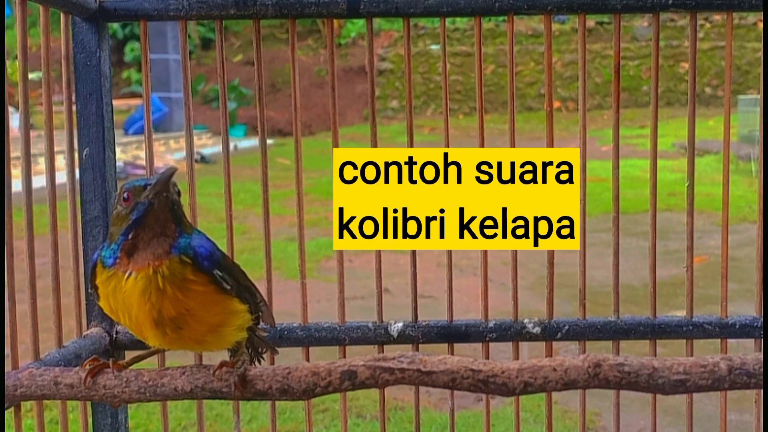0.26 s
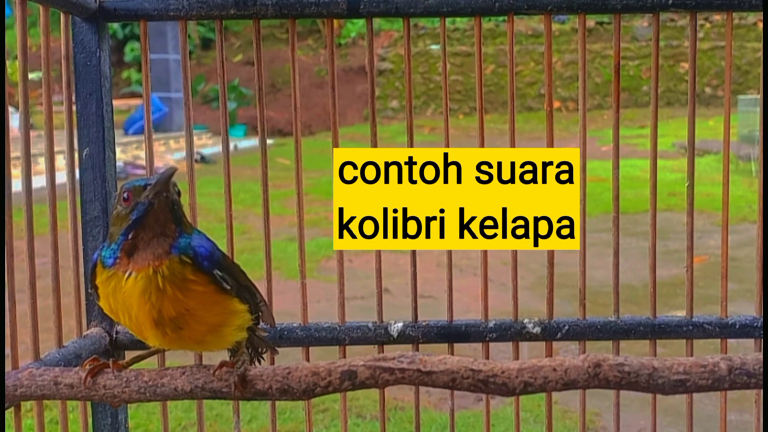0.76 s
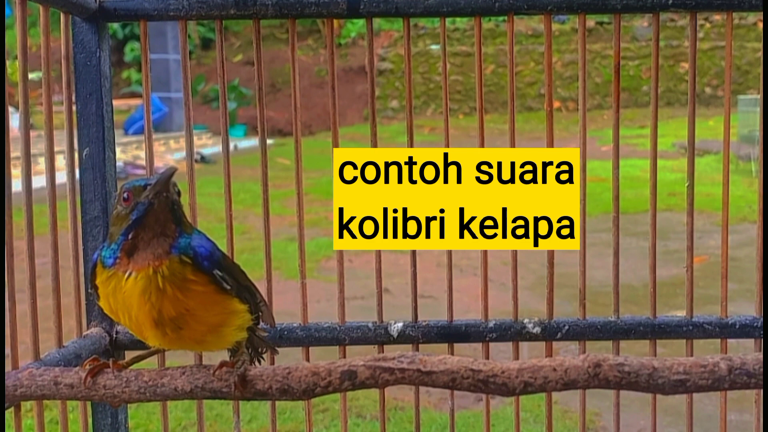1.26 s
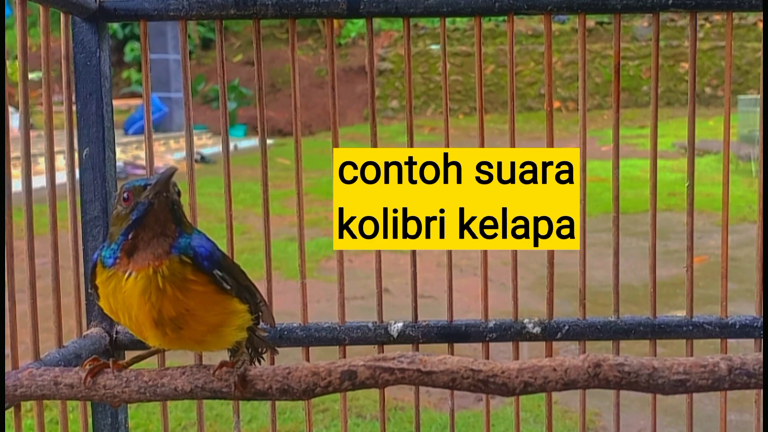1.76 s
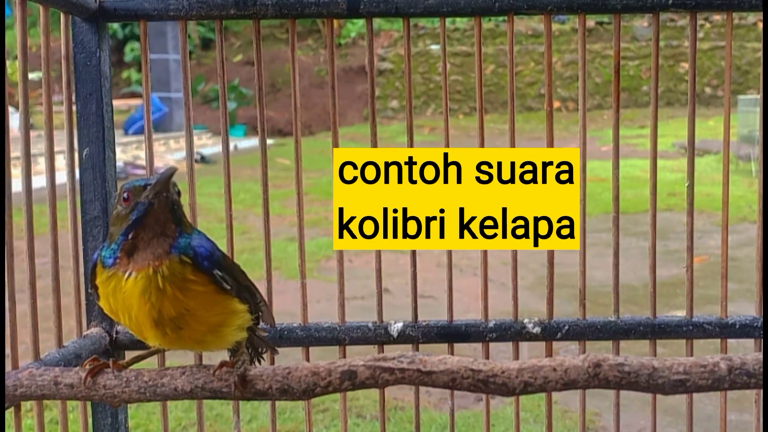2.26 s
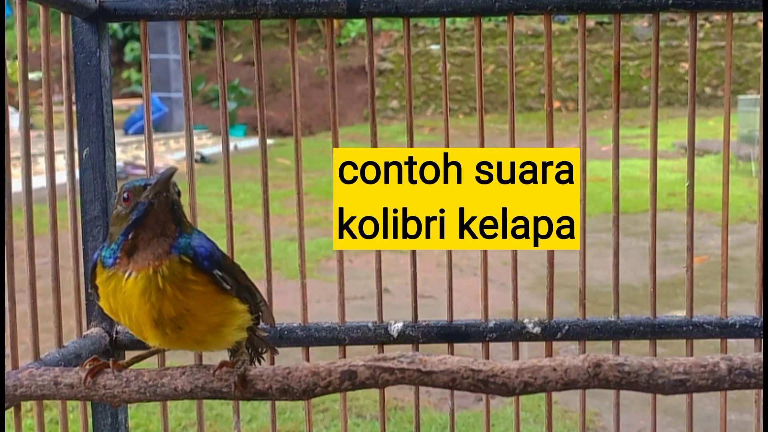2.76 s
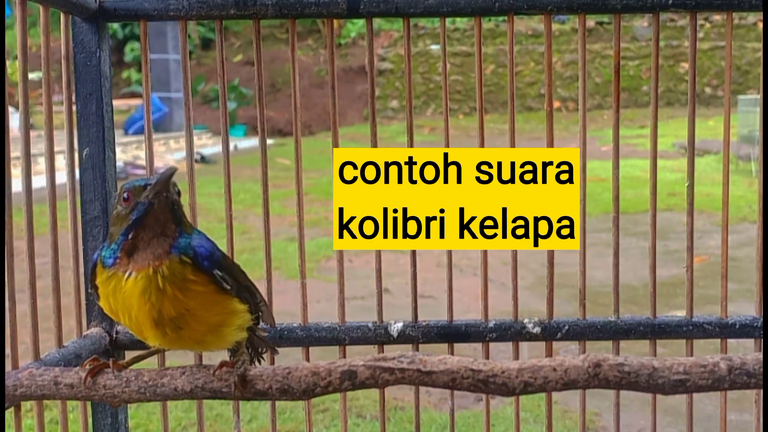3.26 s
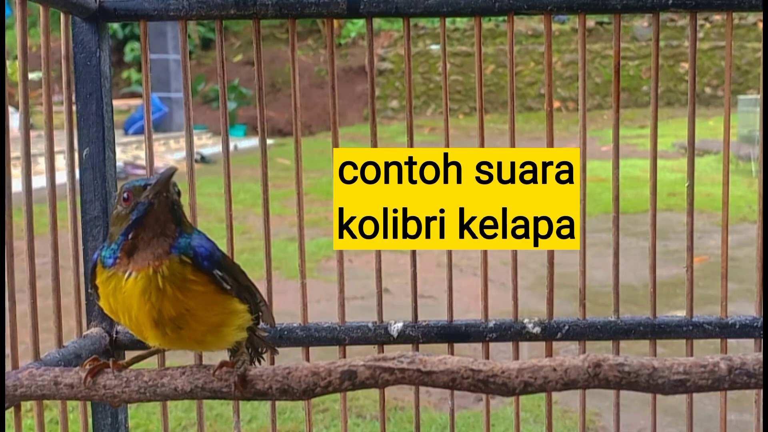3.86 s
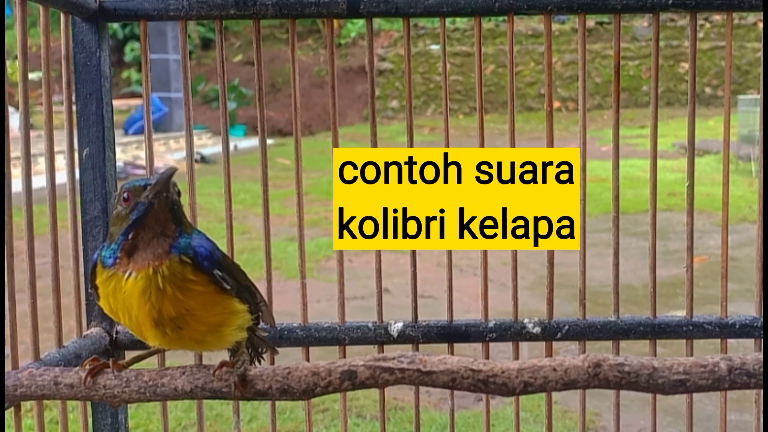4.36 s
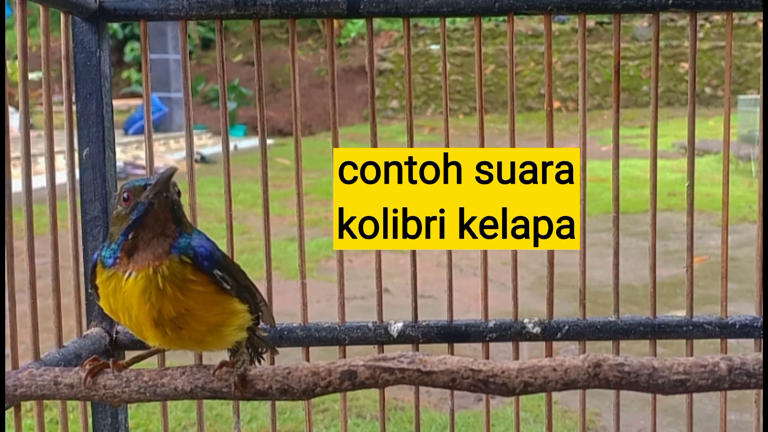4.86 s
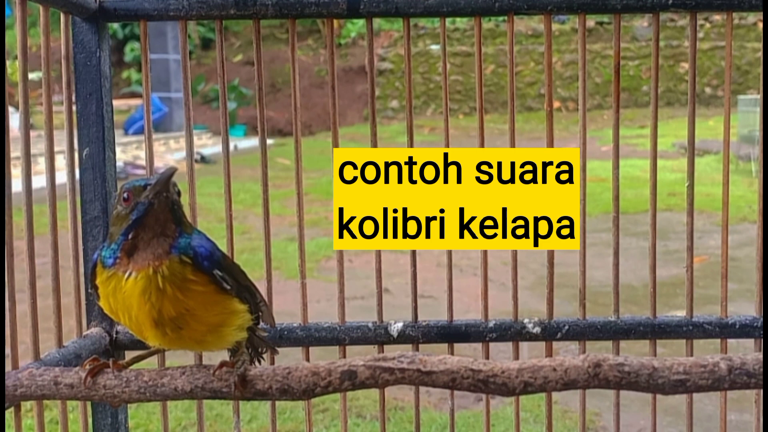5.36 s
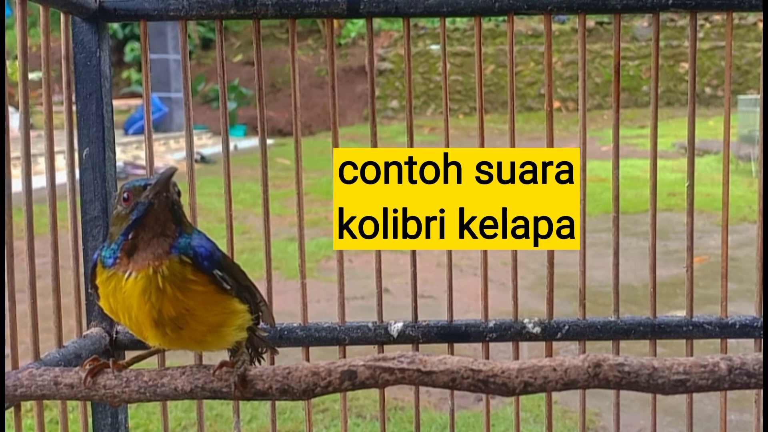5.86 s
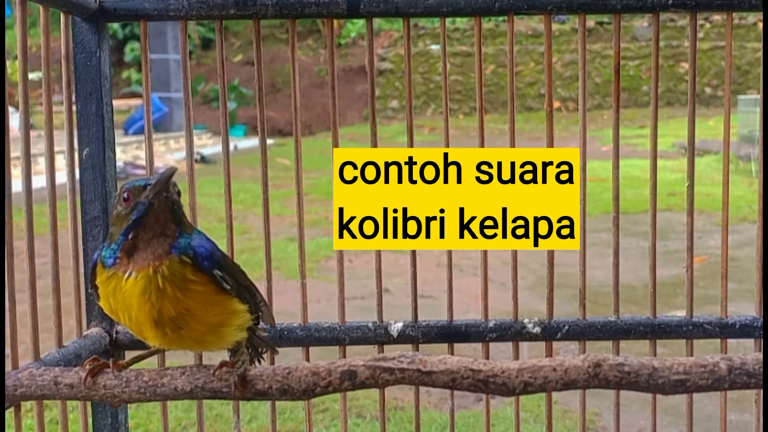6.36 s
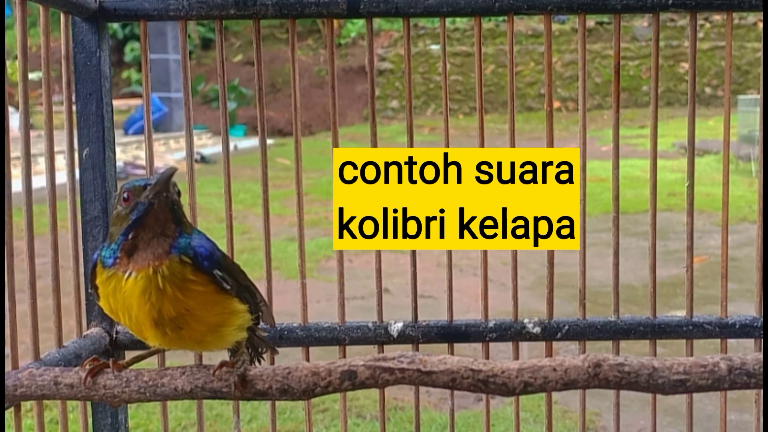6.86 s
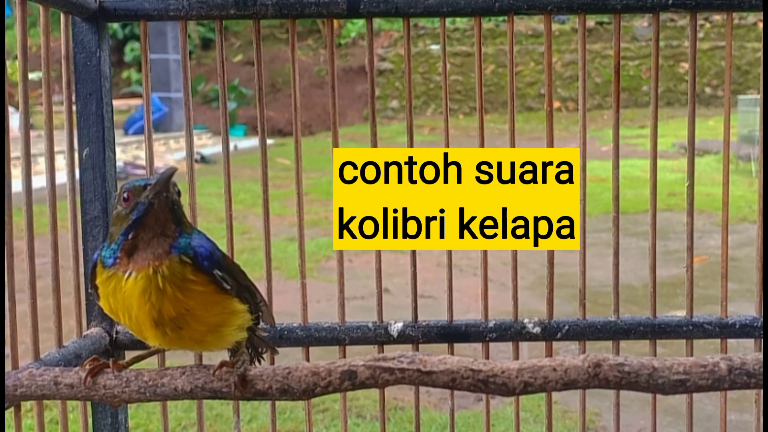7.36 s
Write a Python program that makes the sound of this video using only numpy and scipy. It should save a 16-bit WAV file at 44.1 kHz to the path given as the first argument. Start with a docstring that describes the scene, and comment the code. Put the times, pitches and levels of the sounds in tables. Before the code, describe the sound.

A small bird sings close to the microphone in a wire cage in a garden. A distant engine putters briefly and drops away, then the bird gives swooping high tweets, a fast run of raspy rising chirps, and slower chirps mixed with three nasal notes. Sharp tweets return at the end, with a few faint claw taps and a soft knock. Low traffic rumble and a far bird's whistles sit behind.

```python
"""A garden, where a sunbird sings in a wire cage close to a two-port microphone.
Airflow drives its syrinx into swooping tweets, a fast run of raspy rising chips and three nasal notes.
The wires scatter the song, and the yard reverberates briefly after each note.
Behind it, an engine's firings ring its exhaust and drop away after half a second; traffic rumbles,
a far bird whistles, and near the end come a few claw taps and a soft knock."""
import sys
import numpy as np
from scipy import signal
from scipy.fft import rfft, irfft, next_fast_len
from scipy.io import wavfile
from scipy.ndimage import uniform_filter1d, minimum_filter1d, map_coordinates

SR = 44100
rng = np.random.default_rng(int(sys.argv[2]) if len(sys.argv) > 2 else 0)


def to_wav(sig):
    """Store sig (one row per channel, or 1-D mono) as 16-bit WAV at the path in sys.argv[1].

    Samples outside -1..1 are clipped; the rate is SR.
    """
    pcm = np.clip(np.atleast_2d(sig), -1, 1) * 32767
    pcm = np.round(pcm).astype(np.int16)
    wavfile.write(sys.argv[1], SR, pcm.T)  # frames by channels


N = 336483
TIME = np.arange(N) / SR
CUTOFF_HZ = 15650
# response of the throat and open beak to a partial of a tweet: (frequency [Hz], gain [dB])
THROAT = [(2600, -23.5), (3300, -29.5), (3800, -17.5), (4450, -6.5), (5000, -8.5), (5800, -1), (6600, 3),
          (7500, -9), (8600, -7.5), (10000, -11), (11700, -12), (14000, -16)]


def from_db(db):
    """Amplitude ratio of a level in decibels."""
    return 10 ** (np.asarray(db) / 20)


def rms_one(x):
    """Normalisation to unit mean power."""
    return x / np.sqrt(np.mean(x ** 2) + 1e-20)


def at_hz(points, hz):
    """Interpolation of a table on a logarithmic frequency axis."""
    frequencies, values = np.transpose(points)
    return np.interp(np.log(np.maximum(hz, 1)), np.log(frequencies), values)


def coloured(x, spectrum):
    """Zero-phase filtering: each frequency is scaled by the tabulated gain."""
    size = x.shape[-1]
    return irfft(rfft(x) * from_db(at_hz(spectrum, np.arange(size // 2 + 1) * SR / size)), size)


def white(channels):
    """Uncorrelated white noises, a little longer than the scene."""
    return rng.standard_normal((channels, next_fast_len(N, True)))


def wander(rate_hz):
    """Random modulation: low-passed noise of unit power."""
    lowpass = signal.butter(2, rate_hz, fs=SR, output="sos")
    return rms_one(signal.sosfilt(lowpass, rng.standard_normal(N + SR))[SR:])


def resonance(x, hz, width_hz):
    """A damped two-pole resonator with unit gain at its peak."""
    r = np.exp(-np.pi * width_hz / SR)
    feedback = [1, -2 * r * np.cos(2 * np.pi * hz / SR), r * r]
    return signal.lfilter(np.array([1, 0, -1]) * (1 - r * r) / 2, feedback, x + 1e-18)


def phase_of(hz):
    """Phase in radians, the time integral of frequency."""
    return 2 * np.pi * np.cumsum(hz) / SR


def smooth(x, span_s):
    """A running mean, which rounds off corners."""
    return uniform_filter1d(x, max(1, int(span_s * SR)))


def ease(t, start, end):
    """A raised-cosine step from 0 at start to 1 at end."""
    return (1 - np.cos(np.pi * np.clip((t - start) / (end - start), 0, 1))) / 2


def glide(t, marks):
    """A pitch contour eased through landmarks (time [s], frequency [Hz])."""
    steps = ((b_hz - a_hz) * ease(t, a, b) for (a, a_hz), (b, b_hz) in zip(marks, marks[1:]))
    return marks[0][1] + sum(steps)


def puff(start, end, attack_s, release_s):
    """Time axis and driving pressure of one note: attack, hold, release."""
    t = np.linspace(start, end, int((end - start) * SR))
    return t, ease(t, start, start + attack_s) * (1 - ease(t, end - release_s, end))


def controls(notes, glide_s):
    """Pitch and three gains of a phrase, silent between notes; muscles round off the pitch's corners."""
    times, *columns = np.concatenate(sorted(notes, key=lambda note: note[0][0]), axis=1)
    pitch, *gains = [np.interp(TIME, times, column) for column in columns]
    return smooth(pitch, glide_s), *gains


def engine(roughness=0.29, hiss=1.0, smear=1.8):
    """Forced resonance: the slow firings of one distant cylinder ring the exhaust."""
    # running of the engine: (time [s], firing rate [Hz], level [dB])
    running = [(0, 23.6, -39), (.2, 23.8, -37.5), (0.381, 27, -36.5), (0.489, 20, -40), (0.532, 18, -49),
               (.7, 24.3, -80)]
    # modes of exhaust and body: (frequency [Hz], bandwidth [Hz], gain [dB])
    modes = [(122, 26, 3), (272, 28, 4), (336, 92, -5), (439.4, 19, -0.5), (555, 57, -14.5), (705, 59, -17),
             (834, 20, -13)]
    times, rate, level = np.transpose(running)
    cycles = np.floor(np.cumsum(np.interp(TIME, times, rate)) / SR)
    firings = rms_one(np.diff(cycles, prepend=0)) * (1 + roughness * wander(20))
    firings += hiss * rng.standard_normal(N)
    pipe = sum((-1) ** k * from_db(db) * resonance(firings, hz, width)
               for k, (hz, width, db) in enumerate(modes))
    # reflections from house walls smear the pulses
    mid, side = rng.standard_normal((2, SR // 8)) * np.linspace(1, 0, SR // 8) ** 2
    walls = mid + 0.37 * side * [[1], [-1]]
    reflected = rms_one(signal.fftconvolve(pipe[None], walls, axes=1)[:, :N])
    return rms_one(rms_one(pipe) + smear * reflected) * from_db(np.interp(TIME, times, level))


def traffic(level_db=-43.0, swell_db=1.0):
    """Partial coherence: the low rumble is alike at both ports, its faint hiss nearly uncorrelated."""
    # traffic spectrum: (frequency [Hz], relative spectral density [dB])
    rumble = [(25, -18.5), (50, -23), (70, -2.5), (90, 4), (125, 2), (170, -8), (280, -9), (450, -15),
              (800, -18), (1500, -21.5), (3000, -21.5), (6000, -23.5), (10000, -24), (15000, -29.5)]
    # likeness of the two ports: (frequency [Hz], correlation [1])
    coherence = [(30, 0.98), (90, 0.97), (300, 0.85), (700, 0.17), (1500, 0), (16000, 0.078)]
    mid, side = rfft(coloured(white(channels=2), rumble))
    alike = np.clip(at_hz(coherence, np.linspace(0, SR / 2, len(mid))), -1, 1)
    air = irfft(np.sqrt(1 + alike) * mid + np.sqrt(1 - alike) * side * [[1], [-1]])[:, :N]
    return rms_one(air) * from_db(level_db + swell_db * wander(5.2))


def arch(row, start_hz=2417, lead_s=0.02, rise_s=0.013, release_s=0.041, clear_db=9):
    """Frequency modulation in one hump: the voice is clearest at the crest and rasps on both flanks."""
    crest, fall_s, tail_s, crest_hz, end_hz, first_db, second_db, rasp_db, fading_db_per_s = row
    t, air = puff(crest - lead_s, crest + tail_s, attack_s=0.022, release_s=release_s)
    _, breath = puff(crest - lead_s, crest + tail_s, attack_s=0.012, release_s=release_s)
    hump = np.exp(-((t - crest) / np.where(t < crest, rise_s, fall_s)) ** 2)
    foot = np.where(t < crest, start_hz, end_hz)
    pitch = foot + (crest_hz - foot) * hump
    first = air * from_db(first_db + at_hz(THROAT, pitch))
    second = air ** 2 * from_db(second_db + at_hz(THROAT, 2 * pitch))
    rasp = breath * from_db(rasp_db - clear_db * hump ** 2 - fading_db_per_s * np.maximum(t - crest, 0))
    return t, pitch, first, second, rasp


def slur(row, climb_s=0.032, crest_s=0.053, trough_s=0.084, whistle_s=0.144, whistle_hz=4616,
         swell_s=0.036, swell_db=11, purer_db=11, rasp_hold_s=0.02, rasp_db_per_s=370):
    """A glide towards a pure tone: after a climb and a dip the fundamental swells as the rest fades."""
    start, length, start_hz, crest_hz, trough_hz, first_db, second_db, rasp_db = row
    t, air = puff(start, start + length, attack_s=0.017, release_s=0.018)
    age = t - start
    pitch = glide(age, [(crest_s - climb_s, start_hz), (crest_s, crest_hz),
                        (trough_s, trough_hz), (whistle_s, whistle_hz)])
    swell = ease(age, trough_s, trough_s + swell_s)
    first = air * from_db(first_db + at_hz(THROAT, pitch) - swell_db * (0.5 - swell))
    second = air * from_db(second_db + at_hz(THROAT, 2 * pitch) - purer_db * swell)
    rasp = air * from_db(rasp_db - rasp_db_per_s * np.maximum(age - rasp_hold_s, 0))
    return t, pitch, first, second, rasp


def tweets(jitter=0.00449, flutter_db=1.5, first_db=-4.5, second_db=-7.0, third_db=-10, rasp_db=-6.0):
    """Source and filter: the second harmonic takes over when pitch dips below the throat resonance."""
    # arched tweets, levels relative: (crest time [s], fall time [s], length after crest [s], crest [Hz],
    # end [Hz], fundamental [dB], second harmonic [dB], rasp [dB], rasp decay [dB/s])
    arches = [(0.621, 0.016, 0.049, 4440, 3078, 0, -3.5, -4.5, 50),
              (1.626, 0.0096, 0.047, 5910, 2700, -3, -9, -9.5, 50),
              (1.772, 0.014, 0.055, 4346, 3454, 3, 0, -9, 80),
              (5.855, 0.013, 0.045, 5315, 4056, -2, 0.5, -8.5, 247),
              (6.161, 0.013, 0.06, 5610, 4183, -4, -0.5, -15, 440),
              (6.637, 0.013, 0.055, 6270, 2773, -9, -12, -12.5, 95),
              (6.974, 0.014, 0.052, 5856, 2727, -1, -4, -8.5, 62),
              (7.148, 0.0125, 0.057, 5870, 2565, -2, -10, -7, 69),
              (7.312, 0.015, 0.054, 5790, 2593, -2.5, -4, -14, 63)]
    # slurred tweets, the last cut short, levels relative: (start [s], length [s], start [Hz],
    # crest [Hz], trough [Hz], fundamental [dB], second harmonic [dB], rasp [dB])
    slurs = [(0.732, 0.14, 2797, 5024, 4133, 3.5, -6, -7.5), (0.956, 0.14, 2658, 4302, 3998, 0, -3.5, -5.5),
             (1.173, 0.139, 2753, 4730, 4200, 0, -4.5, -6), (7.477, 0.068, 3370, 5560, 4900, 0, -3.5, -6)]
    notes = [arch(row) for row in arches] + [slur(row) for row in slurs]
    pitch, first, second, rasp = controls(notes, glide_s=0.006)
    unrest = rasp / (first + rasp + 1e-9)
    phase = phase_of(pitch * (1 + jitter * (1 + 6 * unrest) * wander(960)))
    third = np.minimum(second, first) * (3 * pitch < CUTOFF_HZ)
    tone = from_db(first_db) * first * np.sin(phase)
    tone += from_db(second_db) * second * np.sin(2 * phase)
    tone += from_db(third_db) * third * np.sin(3 * phase)
    return np.sqrt(2) * tone * from_db(flutter_db * wander(330)), rasp * from_db(rasp_db)


def at_ports(x):
    """Time and level differences between the ports shift as the head turns; the right mostly leads."""
    # path difference: (time [s], lag of the left port [ms])
    head_lag = [(0.6, 0.13), (1.2, 0.16), (1.63, 0.145), (1.78, 0.091), (2.34, 0.084), (2.44, 0.18),
                (2.57, 0.2), (3.6, 0.2), (4.45, 0.15), (4.9, 0.052), (5.6, 0.061), (5.86, -0.04),
                (6.17, 0.025), (6.65, -0.02), (6.92, 0.15), (7.5, 0.16)]
    # balance of the song: (time [s], left minus right [dB])
    balance = [(0.6, -0.5), (1.6, -3), (1.9, 1.8), (2.5, -1), (3.08, 2.5), (3.35, -1.5), (4.2, -3.5),
               (4.5, 2.3), (5.4, -2.3), (6.17, -2.5), (6.9, -4), (7.5, -0.5)]
    # response of the left port to the song: (frequency [Hz], gain [dB])
    left_port = [(1400, -1.5), (2400, -5), (3600, 3), (6000, 1), (9500, 1), (12500, -16.5), (15500, -2.5)]
    lag = np.interp(TIME, *np.transpose(head_lag)) * SR / 1000
    pan_db = np.interp(TIME, *np.transpose(balance))
    left = map_coordinates(x, [np.arange(N) - lag], order=5, mode="nearest")
    left = coloured(np.pad(left, (0, next_fast_len(N, True) - N)), left_port)[:N]
    return np.array([left * from_db(pan_db / 2), x * from_db(-pan_db / 2)])


def off_wires(x, t60, change_hz):
    """Interference of short paths off the wires ripples the spectrum, changing as the bird moves."""
    t = np.arange(SR // 80) / SR
    paths = rng.standard_normal((2, 2, len(t))) * from_db(-60 * t / t60)
    paths /= np.sqrt(np.sum(paths ** 2, axis=2, keepdims=True))
    one, other = signal.fftconvolve(x[None, None], paths, axes=2)[..., :N]
    turn = np.pi * wander(change_hz)
    return one * np.cos(turn) + other * np.sin(turn)


def reverberation(x, t60, delay_s, length_s):
    """A diffuse field: dense echoes, different at each port, decay exponentially."""
    # colour of the echoes: (frequency [Hz], gain [dB])
    colour = [(1000, 12), (3000, -0.5), (4500, -3), (6300, 1.5), (7500, -3), (10000, 1.5), (15000, -2)]
    t = np.arange(int(length_s * SR)) / SR
    decay = from_db(-60 * t / t60)
    echoes = coloured(rng.standard_normal((2, len(t))), colour) * decay
    echoes *= (t > delay_s) / np.sqrt(np.sum(decay ** 2))
    return signal.fftconvolve(x[None], echoes, axes=1)[:, :N]


def sunbird(scatter_share=0.48, overtone_hz=8500, overtone_db=-9, cage_db=-19, yard_db=-22):
    """Syrinx tones and turbulent rasp arrive directly and by reflection from the cage and the yard."""
    # turbulence spectrum: (frequency [Hz], relative spectral density [dB])
    turbulence = [(700, -30), (1100, -26), (1600, -25), (2300, -19), (3000, -18.5), (3800, -12), (4500, -1),
                  (5500, 0), (6600, -1), (7600, -7), (9600, -7.5), (10700, -12), (12000, -6.5),
                  (13200, -8.5), (15500, -6.5)]
    tone, rasp_envelope = np.sum([tweets(), nasals(), chips()], axis=0)
    noise = rms_one(coloured(white(channels=1), turbulence)[0, :N])
    rasp = noise * rasp_envelope * from_db(2.3 * wander(370))
    # thin wires scatter the rasp and the highest partials
    highpass = signal.butter(4, overtone_hz, "high", fs=SR, output="sos")
    overtones = from_db(overtone_db) * signal.sosfilt(highpass, tone + 1e-18)
    scattered = off_wires(np.sqrt(scatter_share) * rasp + overtones, t60=0.026, change_hz=2.6)
    direct = at_ports(tone + np.sqrt(1 - scatter_share) * rasp)
    cage = reverberation(tone + rasp, t60=0.06, delay_s=0.0022, length_s=0.065)
    yard = reverberation(tone + from_db(-2) * rasp, t60=0.35, delay_s=0.011, length_s=0.45)
    return direct + scattered + from_db(cage_db) * cage + from_db(yard_db) * yard


def far_bird(patchy_db=4.0, waver_hz=110):
    """Multipath propagation: wavering whistles arrive as echoes, which smear and break them up."""
    # whistles: (start [s], end [s], first pitch [Hz], middle [Hz], last [Hz], relative level [dB])
    calls = [(1.27, 1.51, 1934, 1865, 2002, -52), (1.477, 1.72, 2234, 2610, 2366, -40.5),
             (1.722, 2.06, 2510, 2625, 2250, -42), (2.051, 2.25, 2235, 2330, 2184, -49.5),
             (5.42, 5.611, 2590, 2757, 2654, -43.5), (6.198, 6.419, 2410, 2685, 2800, -44.5),
             (6.517, 6.696, 2310, 2436, 2370, -51.5), (7.38, 7.62, 1957, 1992, 2075, -49.5)]
    pitch, gain = np.zeros((2, N))
    for start, end, first, middle, last, db in calls:
        at = (TIME >= start) & (TIME < end)
        progress = np.linspace(0, 1, at.sum())
        pitch[at] = np.polyval(np.polyfit([0, .5, 1], [first, middle, last], 2), progress)
        gain[at] = from_db(db) * np.sqrt(np.abs(np.sin(np.pi * progress)))
    gain *= from_db(patchy_db * wander(20))
    whistle = gain * np.sin(phase_of(pitch + waver_hz * wander(251.4)))
    return reverberation(whistle, t60=0.04, delay_s=0.001913, length_s=.4)


def chips(low_hz=4000, gap_hz=760, top_offset_hz=65, chaos_hz=650, jitter_hz=45,
          sweep_s=0.007, attack_s=0.023, release_s=0.013,
          rasp_fall_db=16, early_db=-4, overtone_db=-9, subharmonic_db=-10):
    """Two-voice phonation: both sides of the syrinx start in chaos, then lock into parallel upsweeps."""
    # chips, levels relative: (start [s], time to mid-sweep [s], length from mid-sweep [s],
    # top pitch of the upsweep less top_offset_hz [Hz], upper voice [dB], lower voice [dB], rasp [dB])
    notes = [(1.885, 0.031, 0.038, 6154, -9, -9, -8), (2.031, 0.036, 0.037, 6330, -11, -1.5, -9.5),
             (2.165, 0.042, 0.026, 6843, -9, -3, -8.5), (2.296, 0.032, 0.027, 6655, -6.5, -12, -3.5),
             (2.409, 0.036, 0.032, 6680, -10, -15, -10), (2.535, 0.034, 0.031, 6630, -6.5, -22, -9),
             (2.655, 0.035, 0.034, 6677, -4.5, -22, -9), (2.781, 0.034, 0.029, 6656, -5.5, -22, -11),
             (2.905, 0.038, 0.027, 6605, -6.5, -26, -9), (3.06, 0.032, 0.037, 6790, -5.5, -18, -8.5),
             (3.554, 0.034, 0.029, 6686, -4.5, -20, -6.5), (3.784, 0.036, 0.032, 6540, -7, -19.5, -8.5),
             (3.974, 0.036, 0.034, 6576, -7, -17, -6), (4.189, 0.036, 0.032, 6615, -7.5, -10, -5.5),
             (4.691, 0.019, 0.049, 6424, -5.5, -15, -7.5), (4.879, 0.031, 0.041, 6620, -7.5, -7, -8),
             (5.37, 0.04, 0.025, 6676, -4.5, -5.5, -8.5), (5.556, 0.039, 0.035, 6570, -8.5, -11, -8)]
    pitch, chaos, upper, lower, rasp, overtone = np.zeros((6, N))
    for start, rough_s, hold_s, top_hz, upper_db, lower_db, rasp_db in notes:
        middle = start + rough_s
        end = middle + hold_s
        at = (TIME >= start) & (TIME < end + release_s / 2)
        t = TIME[at]
        gate = np.clip((t - start) / attack_s, 0, 1) ** 1.3
        gate *= np.clip((end + release_s / 2 - t) / release_s, 0, 1)
        rise = (1 + np.tanh((t - middle + 0.0015) / (2 * sweep_s))) / 2
        locked = np.clip((t - middle + 0.01) / 0.0045, 0, 1)
        sag = 1 - .025 * np.clip(1 - (end - t) / 0.0087, 0, 1)   # pitch sags as the pressure ends
        sweep_hz = low_hz + (top_hz + top_offset_hz - low_hz) * rise
        chaos[at] = 1 - locked
        pitch[at] = locked * sweep_hz * sag + chaos[at] * 6000
        upper[at] = gate * from_db(upper_db - 0.5 + early_db * (1.5 - rise) - 6.3 * chaos[at])
        blend_db = (lower_db + 2) * rise ** 2 + (upper_db - 3) * (2.5 - rise ** 2)
        lower[at] = gate * from_db(blend_db + 6.9 * locked)
        clearing = np.clip((t - middle) / hold_s, 0, 1) ** 0.94
        rasp[at] = gate * from_db(rasp_db - 1 - rasp_fall_db * clearing)
        overtone[at] = from_db(overtone_db) * (1 - rise)
    unrest_hz = jitter_hz + chaos_hz * chaos
    upper_phase = phase_of(pitch + unrest_hz * wander(465))
    lower_phase = phase_of(pitch - gap_hz + (unrest_hz + jitter_hz) * wander(514.4))
    tone = upper * (np.sin(upper_phase) + overtone * np.sin(2 * upper_phase))
    tone += lower * (np.sin(lower_phase) + overtone * np.sin(2 * lower_phase))
    tone += from_db(subharmonic_db) * upper * chaos * np.sin(upper_phase / 2)   # period doubling
    return np.sqrt(2) * tone * from_db(2.5 * wander(200)), rasp


def nasal(row, drop_s=0.032, crest_hz=2240, swell_s=0.071, fade_db=6, third_fall_db=8,
          third_fall_s=0.035, clear_db=30, clear_s=0.051, closing_s=0.037):
    """Pitch and amplitude modulation: a raspy drop clears, swells over a low arch and may end in rasp."""
    start, trough, crest, end, start_hz, trough_hz, end_hz = row[:7]
    second_db, swell_db, third_db, opening_db, closing_db = row[7:]
    t, air = puff(start, end, attack_s=0.028, release_s=0.013)
    pitch = glide(t, [(trough - drop_s, start_hz), (trough, trough_hz), (crest, crest_hz), (end, end_hz)])
    swell = ease(t, trough, trough + swell_s)
    second = from_db(second_db - swell_db * (1 - swell) - fade_db * ease(t, crest, end))
    third = from_db(third_db - third_fall_db * ease(t, trough, trough + third_fall_s))
    rasp = from_db(opening_db - clear_db * ease(t, trough - clear_s, trough + clear_s))
    rasp += from_db(closing_db) * ease(t, end - closing_s, end - closing_s / 2)
    return t, pitch, air * second, air * third, air * rasp


def nasals(jitter=0.0014, rasp_jitter=0.0606, flutter_db=2.0, rasp_db=-1, hoarse_db=-4, husky_db=3):
    """A formant: the throat resonance lifts the second partial of a reedy harmonic series."""
    # nasal notes, levels relative: (start [s], trough [s], crest [s], end [s], start [Hz], trough [Hz],
    # end [Hz], second harmonic [dB], swell [dB], third harmonic [dB], opening rasp [dB], end rasp [dB])
    notes = [(3.238, 3.323, 3.385, 3.438, 2700, 2059, 2097, -6.5, 8.5, -19, -13, -39),
             (4.376, 4.44, 4.52, 4.576, 2206, 1816, 2060, -7.5, 7.5, -25, -11, -63),
             (5.046, 5.119, 5.195, 5.246, 2350, 1898, 2144, -4.5, 14, -24.5, -9, -12)]
    # partials outside the throat resonance: (harmonic number [1], relative level [dB])
    partials = [(1, -22), (4, -32), (5, -28), (6, -25), (7, -43)]
    pitch, second, third, rasp = controls([nasal(row) for row in notes], glide_s=0.004)
    unrest = rasp ** 2 / (second ** 2 + third ** 2 + rasp ** 2 + 1e-9)
    phase = phase_of(pitch * (1 + (jitter + rasp_jitter * unrest) * wander(610)))
    tone = second * np.sin(2 * phase) + third * np.sin(3 * phase)
    drive = np.sqrt(np.abs(second)) * (1 - unrest)   # off the resonance, half the swell in decibels
    tone += drive * sum(from_db(db + husky_db * wander(223)) * np.sin(k * phase) for k, db in partials)
    # period doubling in hoarse stretches adds lines between the partials
    between = np.sin(5 * phase / 2) + np.sin(3 * phase / 2) / 3
    tone += from_db(hoarse_db) * np.sqrt(np.abs(rasp * third)) * between
    return np.sqrt(2) * tone * from_db(flutter_db * wander(72)), rasp * from_db(rasp_db)


def claw_taps(t60=0.17, gain_db=-10):
    """Impact noise: claws on perch and wires make dry broadband bursts that decay exponentially."""
    # contacts: (time [s], relative level [dB])
    contacts = [(5.7828, -23), (6.516, -26.5), (6.8583, -25.5), (6.926, -24)]
    # their spectrum: (frequency [Hz], relative level [dB])
    colour = [(150, 8.5), (600, 4.3), (3000, 1.4), (9000, 5.5), (15000, 3.1)]
    envelope = sum(from_db(db + gain_db - 60 * np.abs(TIME - start) / t60) * (TIME >= start)
                   for start, db in contacts)
    return envelope * rms_one(coloured(white(channels=2), colour)[:, :N])


def knock(at_s=6.928, hz=195, t60=0.22, level_db=-33):
    """A single damped mode, heard as a soft low knock."""
    age = np.maximum(TIME - at_s, 0)
    return from_db(level_db - 60 * age / t60) * np.sin(2 * np.pi * hz * age)


def scene():
    """Superposition of the bird in front and the garden behind."""
    return sunbird() + far_bird() + claw_taps() + knock() + engine() + traffic()


def record(dry, ceiling=0.97):
    """Fast peak limiting holds the loudest notes near full scale; a steep low-pass cuts the top."""
    wanted_gain = np.minimum(1, ceiling / (np.abs(dry).max(axis=0) + 1e-9))
    gain = smooth(minimum_filter1d(wanted_gain, size=SR // 500), span_s=0.002)
    lowpass = signal.ellip(12, .1, 95, CUTOFF_HZ, fs=SR, output="sos")
    return signal.sosfilt(lowpass, dry * gain)


dry = scene()
out = record(dry)
to_wav(out)
```